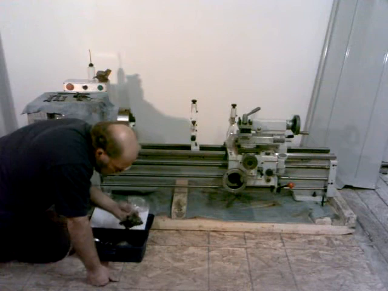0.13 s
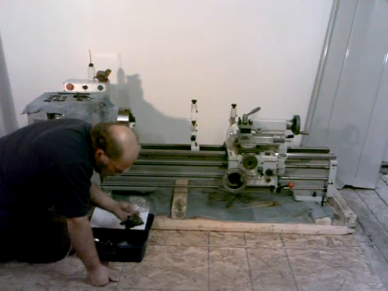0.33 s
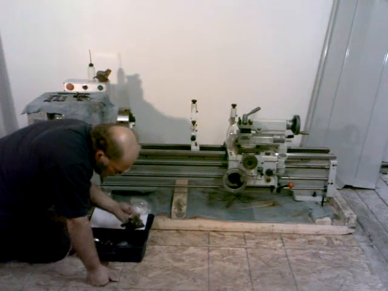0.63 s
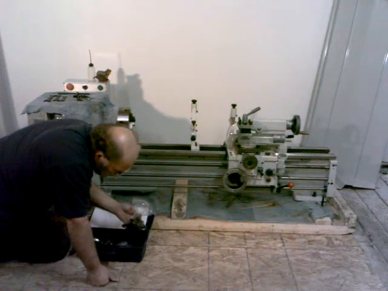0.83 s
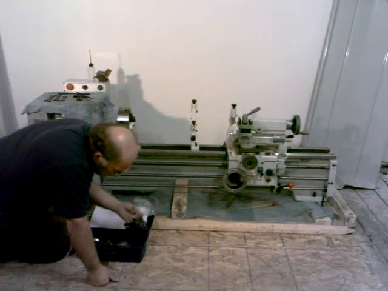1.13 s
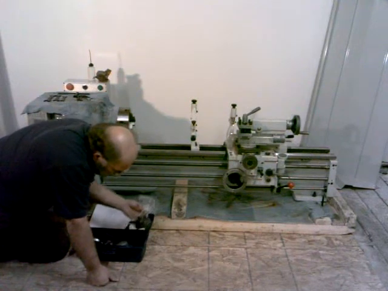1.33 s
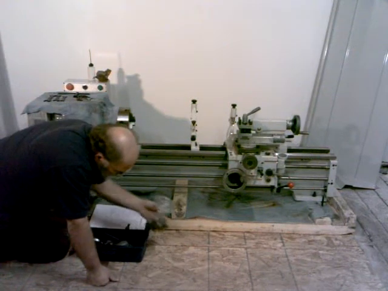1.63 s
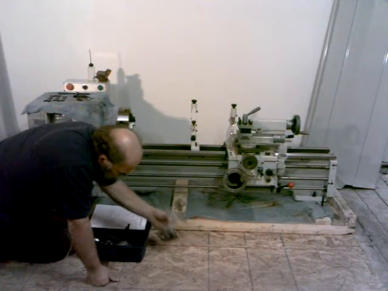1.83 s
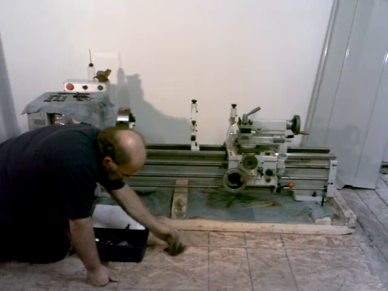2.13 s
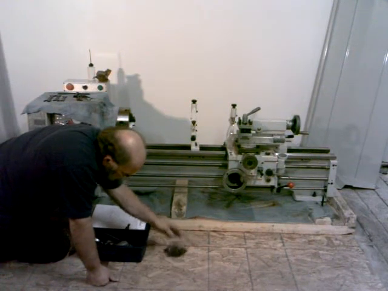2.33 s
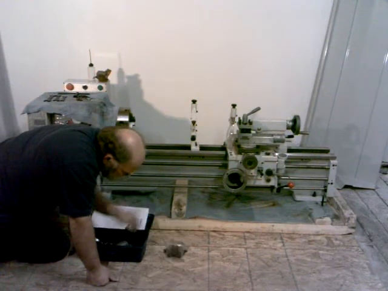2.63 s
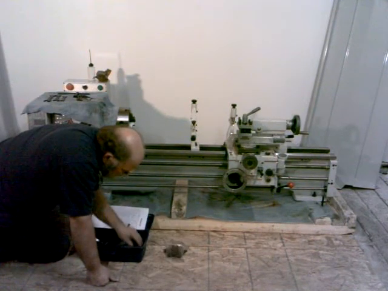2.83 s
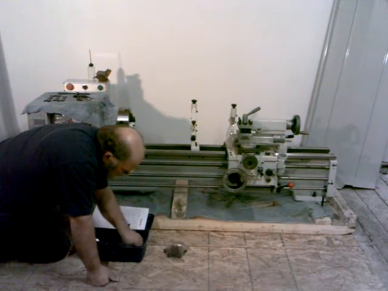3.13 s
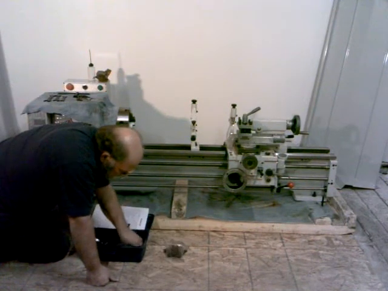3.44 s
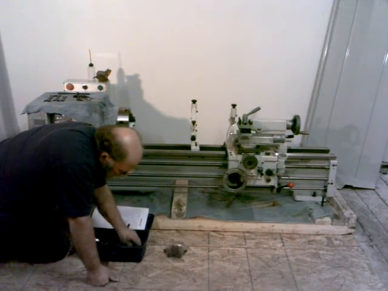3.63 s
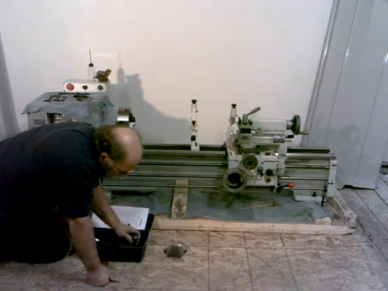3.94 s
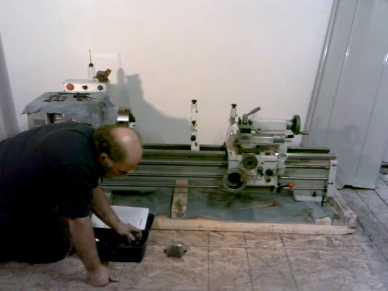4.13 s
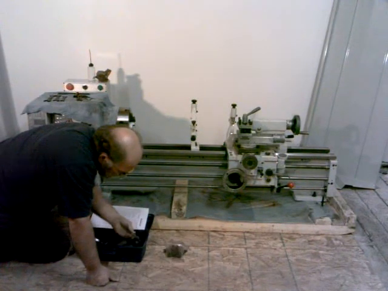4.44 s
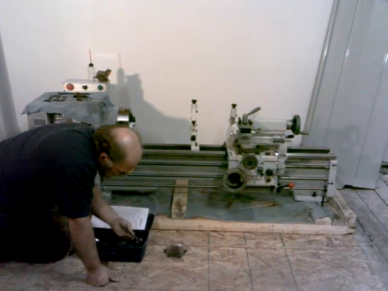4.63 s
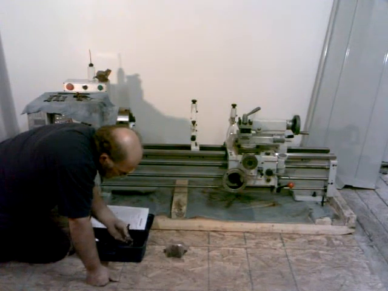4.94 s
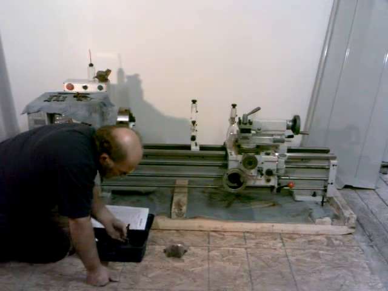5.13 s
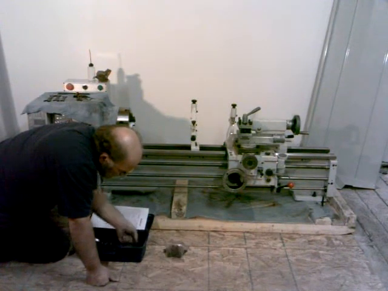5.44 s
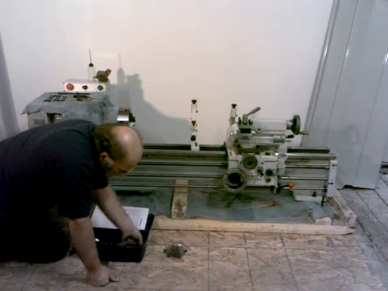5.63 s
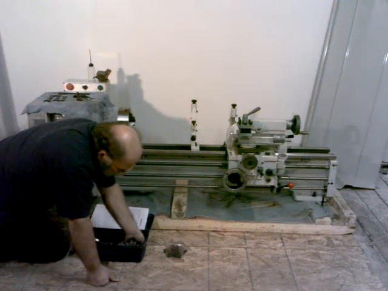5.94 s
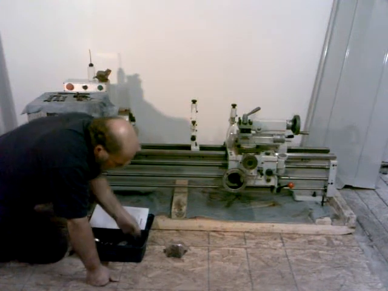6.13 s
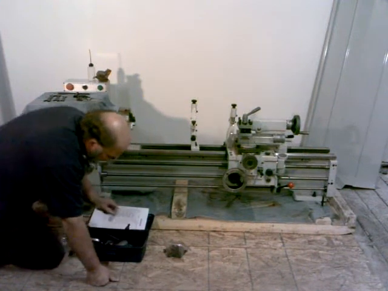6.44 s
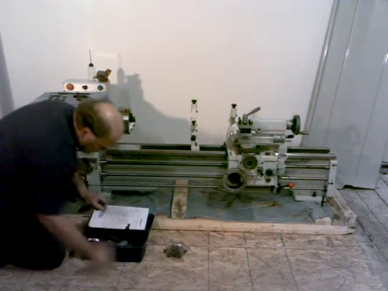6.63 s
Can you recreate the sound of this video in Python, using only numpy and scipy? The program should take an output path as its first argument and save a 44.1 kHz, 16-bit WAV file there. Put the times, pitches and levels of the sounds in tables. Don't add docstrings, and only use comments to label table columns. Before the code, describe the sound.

In a bare workshop, a kneeling man sorts steel tools in a hard plastic case. A sharp clatter opens, thinning to small clicks; a heavy piece is set down on the floor with a low thud and faint ring. Rummaging rattles follow, then the loudest tumbling crash of tools, then sparse light knocks. Short room echo; a dull camera microphone some metres away adds hiss and faint electronic chirps.

```python
import sys
import numpy as np
from scipy import signal
from scipy.fft import rfft, irfft
from scipy.io import wavfile
from scipy.ndimage import uniform_filter1d

SR = 44100
rng = np.random.default_rng(int(sys.argv[2]) if len(sys.argv) > 2 else 0)


def to_linear_factor(level_db):
    exponent = np.asarray(level_db, float) / 20
    return 10 ** exponent


def store_pcm(level_fs):
    pcm = np.round(np.clip(level_fs, -1, 1) * 32767).astype(np.int16)
    wavfile.write(sys.argv[1], SR, np.atleast_2d(pcm).T)


N = 298546
SWARM = SR // 3
FRAME_HZ = 15.226

# frequency in Hz, width in Hz, level in dB.
WALL_MODES = [(1394, 310, -4), (1730, 193, 2.5), (2150, 700, -6), (2600, 410, 1), (3260, 720, -5)]


def level(x, db):
    return x * to_linear_factor(db) / np.sqrt(np.mean(x ** 2))


def ring(x, modes):
    total = 0
    for k, (hz, width, db) in enumerate(modes):
        total = total + (-1) ** k * to_linear_factor(db) * signal.lfilter(*signal.iirpeak(hz, hz / width, fs=SR), x)
    return total


def ring_twice(x, hz, width, second_width):
    return ring(ring(x, [(hz, width, 0)]), [(hz, second_width, 0)])


def add(out, s, piece):
    i = max(int(s * SR), 0)
    out[i:i + len(piece)] += piece[:max(len(out) - i, 0)]


def swarm_at(s):
    return slice(int(s * SR), int(s * SR) + SWARM)


def bounces():
    hit = rng.random(N + SR) < 3000 / SR
    return hit * rng.choice([-1, 1], N + SR) * to_linear_factor(1.3 * rng.exponential(1, N + SR))


def fade(db, fade_db, rise_s, bend):
    t = np.arange(SWARM) / SR
    return to_linear_factor(db - max(fade_db, 3) * (t / 0.083) ** bend) * (1 - np.exp(-t / rise_s))


def strike(grip):
    push = np.hanning(13)[1:-1]
    modes = [(hz, 2.8 * width, db + g) for (hz, width, db), g in zip(WALL_MODES, grip)]
    rung = ring(np.pad(push, (0, 2000)), modes)
    return rung / np.max(np.abs(rung))


def tools():
    # frequency in Hz, width in Hz, level in dB.
    hollow_modes = [(503, 335, -3), (605, 256, 0.5), (820, 110, 2), (1030, 790, -6.5)]
    click_modes = [(3915, 770, 2.5), (4330, 640, 8.5), (4700, 490, 5.5), (5380, 900, -1)]
    # start in seconds, clack in dB, hollow in dB relative to clack, hollow
    # pitch in Hz, linger in seconds (longer fades slower; anything below 0.03 counts as 0.03).
    picking = [(0.0005, -36, -7.5, 470, 0.04), (0.0855, -31.5, -7, 727, 0.5), (0.1512, -44, 4, 600, 0.2),
               (0.1594, -14.5, -11, 570, 0.1), (0.205, -23, -11, 1100, 0.44),
               (0.2538, -27, -12.5, 1260, 0.24), (0.299, -47, 4, 810, -1.53), (0.4209, -48, -2.5, 576, 0.2),
               (0.4685, -48, -9, 620, 0.5), (0.4988, -23, -3, 582, 0.27), (0.5413, -32.5, 3, 743, 0.15),
               (0.6775, -51.5, -4, 1400, 0.9), (0.8315, -57.5, 0, 1430, 0.6), (1.1744, -52, -5.5, 1030, 2),
               (1.2160, -35, -20, 1160, -0.1), (1.231, -32, -12.5, 1245, 0.21), (1.732, -55, -29, 514, 0.3)]
    setting_down = [
        (1.9722, -23.5, -1.5, 727, 0.014),
        (1.988, -27, -4.5, 535, 0.2),
        (2.0374, -29, -4.5, 526, 0.29),
        (2.0626, -42, 7.5, 425, 0.17),
        (2.1194, -49, -4.5, 864, 1),
        (2.2672, -32, -2.5, 760, 0.094),
        (2.2857, -34.5, 0.5, 473, 0.25),
        (2.3294, -51, -24, 504, 0.15),
        (2.3734, -52, 5.5, 750, 0.34),
        (2.418, -39, -4, 490, 0.16),
    ]
    stirring = [(2.857, -61.5, 17.5, 487, 0.11), (2.9104, -45, -4.5, 536, 0.52),
                (3.0016, -27, -2.5, 616, 0.26), (3.039, -52, 7, 770, 0.2), (3.109, -35, -7, 580, 0.3),
                (3.1734, -27.5, -6.5, 448, 0.073), (3.1935, -30.5, -3, 384, 0.29),
                (3.3074, -24, -4, 500, 0.52), (3.3214, -31, 3, 500, 0.34), (3.358, -43, 10, 573, 0.14),
                (3.3994, -36, -7, 557, 0.24), (3.4294, -31.5, -32, 535, 0.19), (3.458, -37, -3, 880, 0.24),
                (3.505, -30.5, -9, 627, 0.32), (3.5574, -31, -14, 1400, 0.19),
                (3.6032, -28, -11, 1200, 0.11), (3.633, -23, -2.5, 1160, 0.4),
                (3.6547, -25, -12, 1320, 0.17), (3.6894, -45.5, 19, 695, 0.034)]
    dropping = [(4.4483, -50.5, -28, 507, 1), (4.5046, -24.5, -1, 574, 0.56),
                (4.557, -12.5, -3, 547, 0.069), (4.573, -26.5, 7.5, 640, 0.27),
                (4.6394, -34, -8.5, 870, 0.5), (4.6801, -14, -2.5, 520, 0.21), (4.711, -31, 7.5, 726, 0.3),
                (4.7364, -17, -6, 872, 0.081), (4.7521, -11.5, -1, 471, 0.18),
                (4.7824, -25.5, 2, 870, 0.46), (4.818, -18, 0.5, 628, 0.35), (4.8654, -27, 9.5, 890, 0.063),
                (4.9194, -30, 0, 770, 0.15)]
    tidying = [(5.434, -58, -18, 422, 0.083), (5.588, -32, -11.5, 1380, 0.1), (5.6124, -33, -8, 800, 0.071),
               (5.6894, -54.5, -8, 830, 0.53), (5.7814, -58.5, 11, 575, 0.18),
               (5.8655, -46.5, -7, 480, 0.32), (5.9628, -31, -11, 1260, 0.14),
               (5.9874, -35.5, -8, 1220, 0.11), (6.092, -44.5, -8.5, 820, 0.36),
               (6.14, -60.5, 4, 1380, 0.15), (6.2465, -48, -8, 755, 0.31), (6.5694, -60.5, -4, 404, 0.16)]
    actions = [(picking, -9.5), (setting_down, -12), (stirring, -9.5), (dropping, -7), (tidying, -9.5)]
    contacts = [(*row, click_db) for rows, click_db in actions for row in rows]
    firm_db = -34.5

    knocks, out = bounces(), np.zeros(N)
    hollow = level(ring(ring(knocks, hollow_modes), [(745, 500, 0)]), -9.5)
    wall_knocks = ring(knocks, [(2245, 3200, 0)])
    walls = level(np.array([(-1) ** k * ring(wall_knocks, [mode]) for k, mode in enumerate(WALL_MODES)]), -15.5)
    click = level(ring(ring(knocks, click_modes), [(3870, 1400, 0.022)]), -8)
    click = click + level(ring(knocks, [(9500, 6500, 0)]), -27.5)
    for s, db, hollow_db, hz, linger_s, click_db in contacts:
        part, fade_db = swarm_at(s), 4 / max(linger_s, .03)
        grip = 1.8 * rng.standard_normal(len(WALL_MODES))
        steel_hz = 1250 * 2.6 ** rng.random(3)
        click_db = click_db + 0.1651 * (firm_db - db)
        soft_db = .3 * max(firm_db - db, 0)
        clack = to_linear_factor(grip) @ walls[:, part] / np.sqrt(np.mean(to_linear_factor(2 * grip)))
        note = level(ring_twice(knocks[part], hz, 110, 350), -12.5)
        clink = level(ring(knocks[part], [(f, 60, 0) for f in steel_hz]), -22)
        rattle = clack + clink + to_linear_factor(click_db) * click[part]
        crack = clack + to_linear_factor(click_db + 9.0) * click[part]
        add(out, s, (hollow[part] + note) * fade(db + hollow_db, 1.39 * fade_db, 0.0041, 1.86))
        add(out, s, rattle * fade(db, fade_db, 0.001, 1.79))
        add(out, s, crack * fade(db - 0.5 - soft_db, 900, 0.00017, 0.808))
        add(out, s, strike(grip) * to_linear_factor(db - 4.5 - soft_db))
    return out


def impacts():
    # start in seconds, peak in dB, mode in Hz.
    knock_rows = [(0.1127, -48, 725), (0.1596, -33, 610), (0.2514, -40.5, 544), (0.2873, -38, 882),
                  (0.5009, -38.5, 595), (0.5358, -36, 857), (0.5777, -42.5, 628), (2.2868, -37, 852),
                  (2.2878, -36, 479), (2.3726, -47, 667), (2.4285, -49, 460), (2.4365, -48, 870),
                  (2.8585, -48, 555), (2.9303, -47, 604), (3.0052, -33.5, 620), (3.0281, -36, 662),
                  (3.0451, -36.5, 766), (3.1947, -50, 452), (3.2297, -41, 1134), (3.3234, -20.5, 551),
                  (3.3364, -23.5, 513), (3.3813, -41.5, 500), (3.4242, -37.5, 760), (3.5449, -50, 920),
                  (3.6327, -40, 595), (3.6716, -34, 886), (3.7235, -40, 952), (4.5067, -31.5, 654),
                  (4.5177, -30.5, 480), (4.5626, -19.5, 574), (4.5856, -27.5, 570), (4.6105, -25.5, 840),
                  (4.6375, -38.5, 800), (4.7073, -30.5, 550), (4.7233, -22, 797), (4.7392, -24.5, 820),
                  (4.7522, -20.5, 516), (4.7741, -24, 573), (4.7921, -27, 885), (4.825, -21.5, 592),
                  (4.8979, -31.5, 806), (4.9098, -52, 850), (5.6282, -46.5, 820), (6.0023, -45, 855),
                  (6.0183, -44, 930)]
    clack_rows = [(0.0838, -43, 1730), (0.1686, -23, 1740), (0.1985, -25.5, 1760), (0.2215, -30.5, 2650),
                  (0.2584, -31, 1910), (0.2674, -30, 2710), (0.5048, -34, 1480), (1.9700, -32.5, 2600),
                  (1.9705, -32, 1694), (1.9865, -31, 1860), (1.9945, -36, 2570), (1.9984, -34, 1570),
                  (2.9243, -49, 1800), (3.0022, -43, 1400), (3.0082, -35, 2600), (3.1259, -39.5, 2580),
                  (3.1309, -40, 3160), (3.1927, -38, 1790), (3.3464, -32.5, 2716), (3.3693, -35, 1640),
                  (3.4043, -38, 1740), (3.4412, -39.5, 2650), (3.508, -45, 1670), (3.5569, -37.5, 2820),
                  (3.5629, -41, 1700), (3.6018, -39, 2610), (3.6467, -34.5, 3240), (3.6517, -30, 1340),
                  (3.6547, -35, 2580), (3.6776, -32.5, 3250), (3.6986, -46, 1790), (4.5038, -33, 1355),
                  (4.5077, -29.5, 1653), (4.5556, -29.5, 2740), (4.5596, -23, 1500), (4.5706, -31, 2500),
                  (4.5716, -27.5, 3220), (4.6005, -32, 2710), (4.6823, -30.5, 2850), (4.6893, -24.5, 1350),
                  (4.7362, -23.5, 2620), (4.7522, -29.5, 1420), (4.7582, -29.5, 3080),
                  (4.7642, -31.5, 2080), (4.7731, -23.5, 2580), (4.7811, -34, 2490), (4.7821, -27, 1360),
                  (4.7861, -28.5, 3330), (4.817, -41.5, 2470), (4.832, -29, 1780), (4.842, -29.5, 3210),
                  (4.9019, -33, 1650), (5.5913, -40.5, 1710), (5.5983, -41, 2570), (5.9824, -40, 2720)]
    clink_rows = [(0.1048, -42, 3780), (0.1576, -31, 4350), (0.1656, -36, 5220), (0.1776, -31, 4190),
                  (0.1876, -25.5, 3730), (0.2514, -32, 4840), (0.2704, -51, 3520), (0.2754, -27, 4200),
                  (0.4669, -52, 4030), (0.4969, -41.5, 4260), (0.4979, -40, 4910), (0.5118, -41, 4140),
                  (0.5248, -42, 4130), (1.2352, -38, 4070), (1.9700, -42, 3900), (2.0793, -49, 4950),
                  (3.0161, -40, 4220), (3.0221, -37, 3540), (3.1299, -48, 4950), (3.1927, -44, 3800),
                  (3.3145, -44, 3300), (3.4023, -48, 5000), (3.4053, -40.5, 4100), (3.4272, -42, 4040),
                  (3.5599, -40, 3900), (3.6317, -39, 4830), (3.6317, -32.5, 4230), (3.6627, -33, 4050),
                  (4.5327, -39.5, 3870), (4.5596, -25, 3990), (4.6794, -31, 5000), (4.6804, -30, 4330),
                  (4.6973, -30, 4440), (4.7302, -24, 4230), (4.7582, -23.5, 3850), (4.7582, -25.5, 4950),
                  (4.7731, -29.5, 4640), (4.7851, -28, 3650), (4.7881, -28.5, 4470), (4.821, -29.5, 5100),
                  (4.828, -27.5, 4310), (4.8619, -39.5, 4900), (4.8629, -30, 4090), (5.6142, -45, 3600)]
    mixed_rows = [(0.677, -63, 7750), (1.974, -60.5, 7700), (5.437, -61, 2700), (5.439, -70, 3310),
                  (0.678, -51, 1390), (0.681, -54, 2800), (0.696, -49, 1310), (0.832, -55, 1380),
                  (1.2365, -43, 4440), (1.231, -41, 2570), (1.2365, -42, 1720), (1.247, -40, 3860),
                  (1.268, -44, 1730), (2.909, -47.5, 564), (1.2155, -47, 1740), (1.2155, -52, 4970),
                  (1.2365, -46, 3460), (1.244, -49, 4830), (1.254, -44, 4400), (1.258, -45, 3250),
                  (1.279, -52, 1800), (1.296, -55, 850), (4.562, -18.5, 630), (4.688, -18, 573),
                  (0.498, -57, 5240), (3.172, -41, 2700), (3.172, -52, 4350), (0.159, -24.5, 2700),
                  (0.159, -24.5, 1710), (1.472, -63, 1720), (1.52, -64, 1720), (4.446, -65, 1770),
                  (4.446, -58, 2870), (1.243, -40, 2800), (1.256, -42, 2600), (3.306, -33, 2770),
                  (3.306, -49, 5170), (3.69, -51, 2170)]
    # rise in seconds, time to fade 60 dB in seconds, level in dB
    kinds = [(knock_rows, 0.0015, 0.071, 3.3), (clack_rows, 0.00074, 0.039, 4.5),
             (clink_rows, .0007, 0.041, 3.1), (mixed_rows, 0.0004, 0.038, 5)]
    onset_delay_s, snap_db, snap_t60_s = 0.001474, 3.5, 0.0082
    t, out = np.arange(SR // 10) / SR, np.zeros(N)
    for rows, rise_s, t60_s, kind_db in kinds:
        for s, db, hz in rows:
            shape = (1 - np.exp(-t / rise_s)) * to_linear_factor(db + kind_db - 60 * t / t60_s)
            splash = ring(ring(rng.standard_normal(len(t)), [(hz, hz / 2, 0)]), [(2600, 3300, 0)])
            snap = to_linear_factor(db + snap_db - 60 * t / snap_t60_s) * splash
            add(out, s + onset_delay_s, shape * np.sin(2 * np.pi * hz * t) + snap)
    return out


def thuds():
    # frequency in Hz, width in Hz, level in dB.
    bottom_modes = [(176, 20, -6.5), (240, 40, -9.5), (367, 120, -8.5)]
    # start in seconds, thud in dB, pitch in Hz, fade in dB over the first 0.083 s.
    landings = [(0.157, -37.5, 388, 17), (1.257, -49, 143, 35), (1.993, -43, 420, 10),
                (2.04, -25.5, 276, 43), (2.066, -25, 294, 45), (2.268, -40, 433, 13.5),
                (2.375, -45, 430, 45), (2.42, -44, 386, 42), (2.859, -48.5, 396, 42), (2.917, -59, 148, 5),
                (3.171, -41.5, 420, 24), (3.307, -38, 307, 28), (3.325, -20.5, 430, 53),
                (3.357, -30.5, 324, 47), (3.429, -50, 320, 15), (4.508, -31, 425, 20),
                (4.567, -29.5, 205, 27), (4.558, -31, 521, 35), (4.598, -31, 149, 31),
                (4.691, -22.5, 410, 25), (4.756, -23, 400, 38), (4.818, -28, 346, 26),
                (4.867, -33.5, 288, 21.5), (5.06, -60.5, 225, 1.5), (6.1, -49, 240, 40)]
    knocks, out = bounces(), np.zeros(N)
    bottom = level(ring(ring(knocks, bottom_modes), [(296, 390, 0)]), -6.0)
    for s, db, hz, fade_db in landings:
        part = swarm_at(s)
        note = level(ring_twice(knocks[part], hz, 40, 150), -6.5)
        add(out, s, (bottom[part] + note) * fade(db, fade_db, 0.00039, 0.7))
    return out


def singing():
    # start in seconds, peak in dB.
    bar_strikes = [(0.4214, -74), (3.1921, -65), (3.33, -62), (4.4494, -55.5), (4.5064, -42), (4.5344, -49),
                   (4.5796, -56), (4.6294, -60), (4.7393, -43.5), (4.7608, -51), (4.7994, -58),
                   (4.8444, -55)]
    gear_strikes = [
        (2.0303, -50.5),
        (2.069, -48),
        (2.2744, -54),
        (2.3251, -51.5),
        (2.4104, -62),
    ]
    pin_strikes = [
        (2.2722, -52),
    ]
    washer_strikes = [
        (0.151, -52),
        (0.4214, -62),
        (0.4677, -59),
    ]
    # strikes, mode in Hz, width in Hz, fade in dB per 0.083 s
    parts = [(bar_strikes, 7860, 35, 16), (gear_strikes, 10150, 90, 25),
             (pin_strikes, 13400, 160, 30), (washer_strikes, 12700, 160, 30)]
    t, knocks, out = np.arange(SWARM) / SR, bounces(), np.zeros(N)
    for strikes, hz, width, fade_db in parts:
        shaken = level(ring_twice(knocks, hz, width, 4 * width), -7)
        free = 7 / width * np.sin(2 * np.pi * hz * t)
        for s, db in strikes:
            add(out, s, (free + shaken[swarm_at(s)]) * fade(db, fade_db, 0.0013, 1))
    return out


def ticks():
    # start in seconds, peak in dB, centre in Hz.
    edge_hits = [(0.147, -51, 9850), (0.1515, -46, 11100), (0.16, -39, 10400), (0.4209, -46.5, 9500),
                 (0.4688, -52, 11000), (3.6334, -48, 9500), (3.6526, -49, 9150), (4.5042, -50.5, 9850),
                 (4.56, -40.5, 12000), (4.6834, -38.5, 10600), (4.7386, -44, 9930), (4.7531, -37, 9620),
                 (4.8236, -36, 9600)]
    out = np.zeros(N)
    for s, db, hz in edge_hits:
        burst = ring_twice(rng.standard_normal(SWARM), hz, 8200, 8200)
        add(out, s, level(burst, -3.5) * fade(db, 294.5, 0.0002, 1))
    return out


def room(x):
    t60_s, treble_t60_s, echo_db = 0.29, 0.27, -7
    t = np.arange(SR // 2) / SR
    noise = rng.standard_normal(len(t))
    bass = signal.lfilter(*signal.butter(1, 1500, fs=SR), noise)
    tail = bass * to_linear_factor(-60 * t / t60_s) + (noise - bass) * to_linear_factor(-60 * t / treble_t60_s)
    tail = tail * np.clip((t - .004) / 0.0085, 0, 1)
    return x + to_linear_factor(echo_db) * signal.fftconvolve(x, tail / np.sqrt(np.sum(tail ** 2)))[:N]


def rumble():
    # peak time in seconds, level in dB, release in dB per second.
    flexes = [(0.0, -41.5, 300), (0.17, -49, 32), (0.45, -61.5, 3.5), (0.81, -56, 20), (1.62, -60, 120),
              (1.81, -56, 30), (2.07, -38, 116), (2.32, -52.5, 25), (2.94, -46.5, 21.5), (3.09, -58.5, 33),
              (3.345, -28, 148), (3.53, -41.5, 126), (3.67, -49, 130), (4.26, -63, 42), (4.58, -33.5, 166),
              (4.69, -41.5, 198), (4.799, -41.5, 49), (4.9, -49.5, 130), (5.239, -58, 71),
              (5.43, -50.5, 9.5), (5.98, -47, 180), (6.111, -46, 140), (6.26, -41.5, 194), (6.43, -50, 43),
              (6.58, -52, 134)]
    rise_db_per_s, still_db = 422, -64.5
    t = np.arange(N) / SR
    boards = ring(rng.standard_normal(N), [(22.05, 43.1, -0.4), (45.2, 27.3, -0.16)])
    boards = ring(boards, [(36.3, 189, 0)])
    energy = to_linear_factor(2 * still_db)
    for s, db, release_db_per_s in flexes:
        drop_db = np.maximum(rise_db_per_s * (s - t), release_db_per_s * (t - s))
        energy = energy + to_linear_factor(2 * (db - drop_db))
    return level(boards, -4.0) * np.sqrt(energy)


def beep(hz, length_s, db, glide=0.):
    t = np.arange(int(length_s * SR) + 8) / SR
    wobble = np.cumsum(uniform_filter1d(rng.standard_normal(len(t)), size=60)) / 38
    phase = 2 * np.pi * hz * t * (1 + glide * (t / t[-1] - 1)) + wobble
    soft_ends = np.abs(np.sin(np.pi * t / t[-1])) ** .5
    return to_linear_factor(db) * np.sqrt(2) * soft_ends * np.sin(phase)


def housekeeping():
    # start in seconds, end in seconds.
    low_runs = [
        (0.1517, 3.0),
        (3.1733, 6.8),
    ]
    out = np.zeros(N)
    low = np.concatenate([np.arange(a, b, 3 / FRAME_HZ) for a, b in low_runs])
    high = [s for s in np.arange(0.0222, N / SR, 4 / FRAME_HZ) if np.min(np.abs(low - s)) > .02]
    for hz, times, db in ((9400, low, -68), (9950, high, -69.5)):
        for s in times:
            add(out, s, beep(hz, .011, db + rng.standard_normal()))
    return out


def camera():
    # frequency in Hz, density in dB per Hz.
    hiss_colour = [(35, -30), (60, 2), (180, -12), (500, -15), (1000, -18), (2000, -21.5), (3400, -21),
                   (4600, -22.5), (6200, -24.5), (12000, -23.5), (14300, -24.5), (15000, -20), (15800, -36)]
    # frequency in Hz, level in dB.
    whines = [(1023, -87), (1744, -91), (2460, -91), (2579, -90), (2939, -87), (2998, -90), (3058, -92),
              (3122, -89), (3182, -84), (3241, -90), (14594, -94), (14713, -79), (14772, -94), (14831, -94),
              (15493, -101), (15612, -101), (15676, -100), (15735, -96)]
    # seconds into the frame, pitch in Hz, length in seconds,
    # level in dB, share of frames that have it.
    chirps = [(.028, 14350, .006, -72, 1), (.037, 14000, .007, -70.5, 1), (.045, 13450, .007, -71, 1),
              (.051, 13800, .005, -73, 1), (.051, 15000, .004, -80, 1), (.032, 8900, .003, -73.5, .8),
              (.041, 8850, .003, -73, .9), (.052, 8700, .003, -73, .9), (.053, 3780, .032, -71.5, 1),
              (.017, 4300, .014, -71.5, .65), (.032, 4030, .008, -73, .7), (.041, 4340, .008, -72, .8),
              (.03, 5600, .01, -74, .06), (.004, 7750, .012, -72, .03)]
    t, (hiss_hz, hiss_db) = np.arange(N) / SR, np.transpose(hiss_colour)
    colour = to_linear_factor(np.interp(np.log(np.fft.rfftfreq(N, 1 / SR) + 1), np.log(hiss_hz), hiss_db))
    hiss = level(irfft(rfft(rng.standard_normal(N)) * colour, N), -66)
    out = hiss * to_linear_factor(.8 * np.cos(2 * np.pi * FRAME_HZ * (t - .04)))
    for hz, db in whines:
        out += to_linear_factor(db) * np.sqrt(2) * np.sin(2 * np.pi * hz * t)
    for frame_s in np.arange(-1, N / SR * FRAME_HZ) / FRAME_HZ:
        for s, hz, length_s, db, share in chirps:
            luck, stretch, drift = rng.random(3)
            if luck < share and frame_s + s > 0:
                chirp = beep(hz * (.996 + .008 * drift), length_s * (.75 + .4 * stretch), db, .05 * (drift - .6))
                add(out, frame_s + s, chirp)
    return out + housekeeping()


def scene():
    echo_share = 0.4
    single = impacts()
    heard = room(to_linear_factor(-1.5) * tools() + echo_share * single + thuds() + singing() + ticks())
    return (heard + (1 - echo_share) * single + rumble())[None]


def roll_off(x):
    return signal.sosfilt(signal.butter(12, 15880, fs=SR, output="sos"), x)


def record(dry):
    heard = np.tanh(1.42 * dry) / 1.646
    pumping = signal.lfilter(*signal.butter(1, [25, 160], 'band', fs=SR), heard ** 2)
    heard = heard + .25 * pumping + camera()
    heard = signal.sosfilt(signal.ellip(10, .2, 60, 15780, fs=SR, output="sos"), heard)
    return roll_off(heard)


dry = scene()
out = record(dry)
store_pcm(out)
```